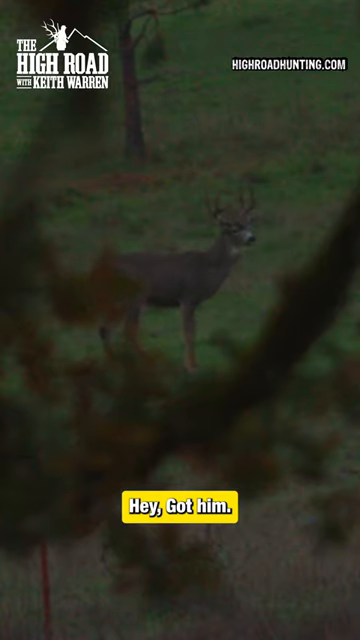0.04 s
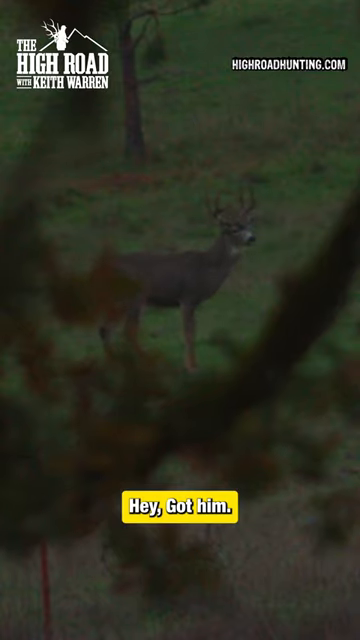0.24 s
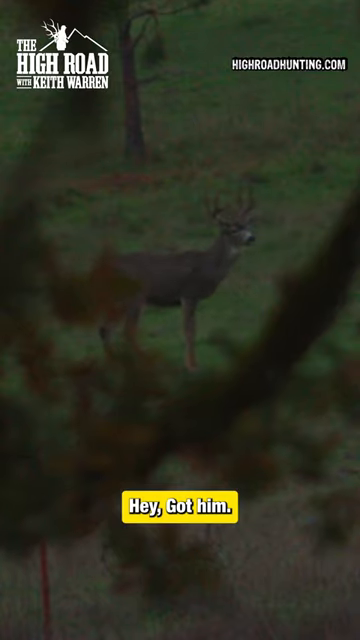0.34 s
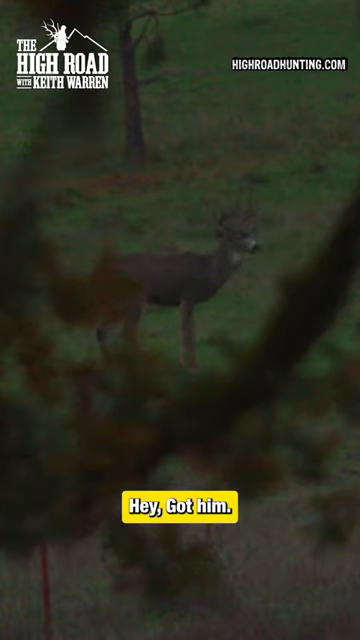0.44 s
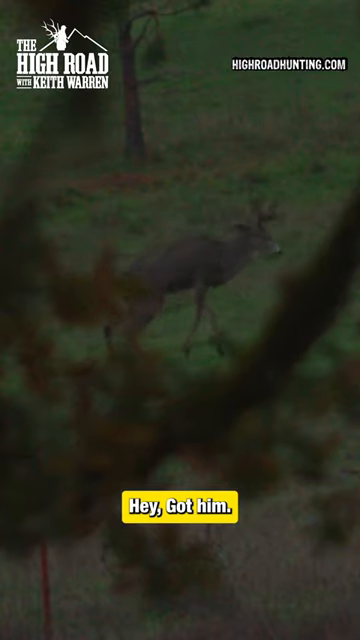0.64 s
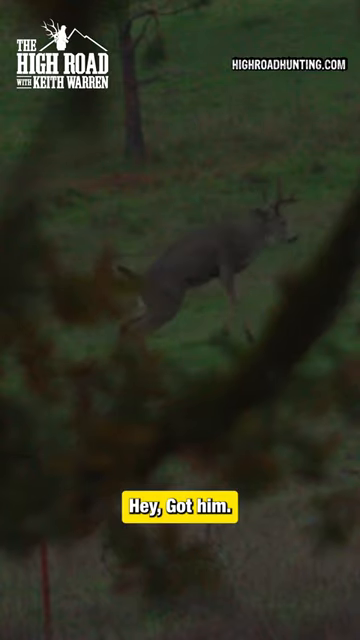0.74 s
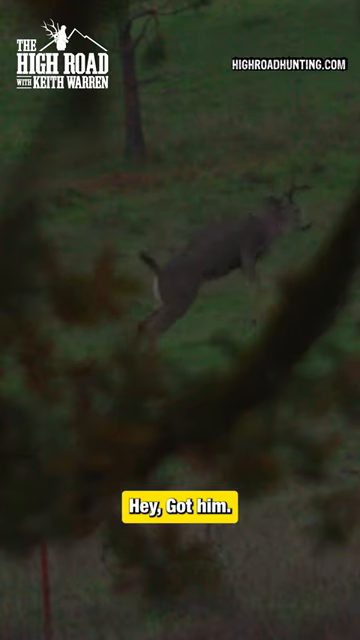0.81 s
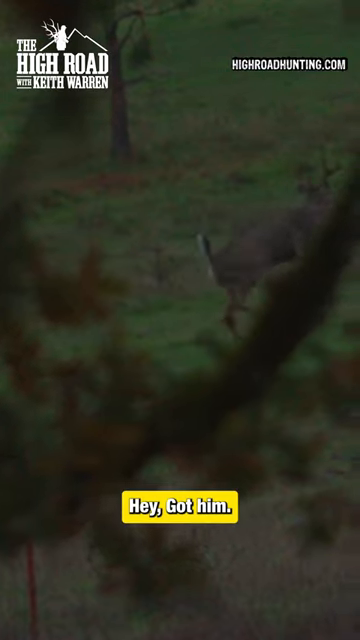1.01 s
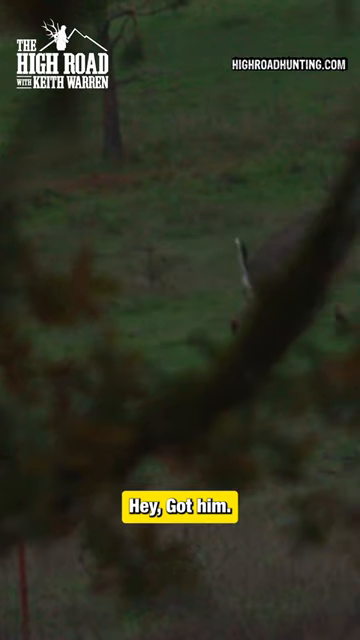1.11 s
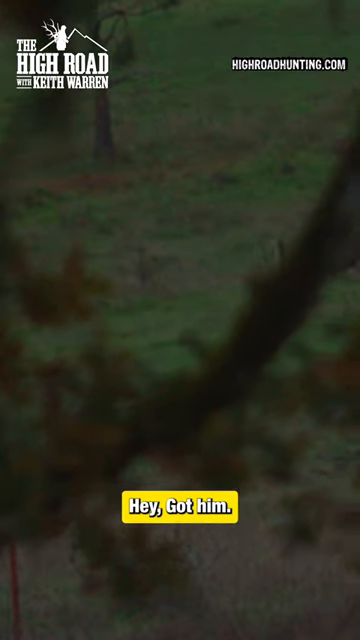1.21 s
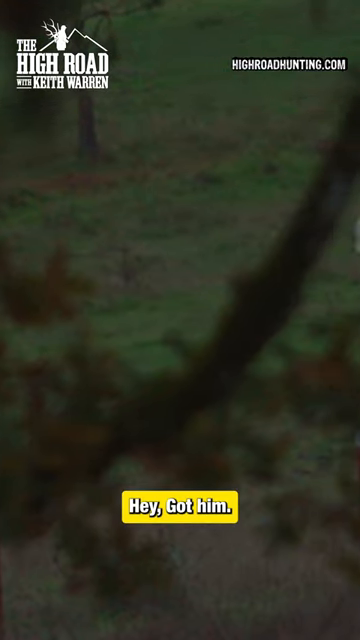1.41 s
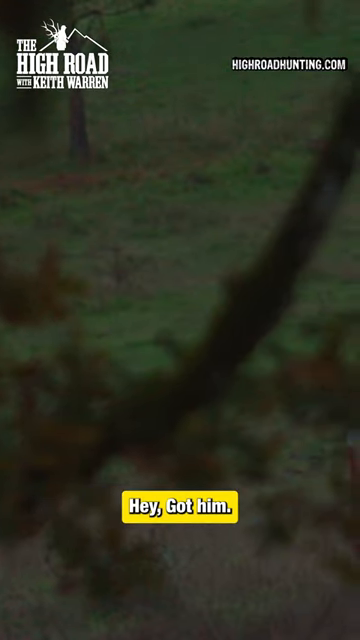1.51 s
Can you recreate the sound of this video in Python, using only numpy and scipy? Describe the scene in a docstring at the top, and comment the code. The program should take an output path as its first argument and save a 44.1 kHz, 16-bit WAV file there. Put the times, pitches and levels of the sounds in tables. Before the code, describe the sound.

One loud rifle shot overloads a nearby microphone outdoors. A metallic clack and a distant bullet impact follow as the report rolls back off the slopes, growing duller. Soft rustling, hollow knocks and a small tick come last, close by.

```python
"""Open pasture, trees and slopes around it. One rifle shot: first the bullet's crack, then a muzzle blast
that overloads the microphone. Steel rings thinly and the action clacks. The bullet thuds home far away,
and the report rolls back off the land, duller as it goes. At the end, close by, come a soft rustle,
a very faint whistle, a few hollow knocks and a small tick."""
import sys
import numpy as np
from scipy import signal
from scipy.fft import rfft, irfft, next_fast_len
from scipy.io import wavfile
from scipy.ndimage import map_coordinates

SR = 44100
rng = np.random.default_rng(int(sys.argv[2]) if len(sys.argv) > 2 else 0)


def transcribe(u):
    """Save the signal u as a 16-bit wav file named by the first command-line argument.

    u: samples, shape (n,) or (channels, n), limited to [-1, 1]; the rate is SR.
    q: integer samples, one column per channel.
    """
    v = np.clip(np.atleast_2d(u).T, -1, 1)
    q = np.round(v * 32767).astype(np.int16)
    wavfile.write(sys.argv[1], SR, q)


N = 68355
TIME = np.arange(N) / SR
CRACK_S, BLAST_S, HIT_S = .2367, .2418, .7939

# Quiet air over the pasture. Each row: frequency in Hz, relative level in dB.
AIR_SPECTRUM = [(25, -9), (60, -2.5), (220, 2), (380, -2.5), (520, -0.5), (750, -5.5), (1400, -11),
                (3300, -13), (6500, -16.5), (10000, -27), (16000, -36)]
# The whistle's partials. Each row: pitch ratio, relative level in dB.
WHISTLE_PARTIALS = [(1, -3), (0.89, -4), (.662, -5)]
# Rustles close by. Each row: centre in seconds, level in dB, half width in seconds.
RUSTLE_STROKES = [(1.149, -53.5, 0.081), (1.41, -53, 0.068)]
# Their soft hiss. Each row: frequency in Hz, relative level in dB.
RUSTLE_SPECTRUM = [(1000, -25), (4500, 0), (7000, -2.5), (10000, -9.5), (15000, -28)]
# Knocks close by. Each row: start in seconds, gain in dB.
KNOCK_STRIKES = [(1.4098, -13), (1.4234, -24), (1.4264, -19.5), (1.4816, -24), (1.4858, -29)]
# The hollow body they sound. Each row: frequency in Hz, relative level in dB, t60 in seconds.
HOLLOW_MODES = [(470, 0, 0.027), (586, -0.5, 0.012), (830, -6, .012), (174, -16.5, 0.06)]
# The bright tick. Each row: frequency in Hz, relative level in dB.
TICK_SPECTRUM = [(1000, -17), (4200, -15), (5600, 4), (7500, -6), (9500, -10), (11500, -21), (16000, -20)]
# The report scattered by the land. Each row: frequency in Hz, relative level in dB.
ROLL_SPECTRUM = [(25, -11), (120, -2.5), (300, -9), (550, 3), (900, 3.5), (1400, -3.5), (2200, -1.5),
                 (4000, 3.5), (6500, 2.5), (10000, -7.5), (16000, -24)]
# How long it hangs on. Each row: frequency in Hz, t60 in seconds.
ROLL_DECAY = [(60, 1.6), (500, 1.66), (1000, 1.79), (2200, 1.86), (4000, 1.136), (7000, 0.87),
              (11000, 0.65), (16000, .55)]
# The long echo off far slopes. Each row: time in seconds, level in dB.
SLOPE_SWELL = [(.6, -67), (0.898, -34.5), (1.05, -40), (1.18, -34.5), (1.3, -38.5), (1.418, -40),
               (1.55, -40)]
# Its dull tone. Each row: frequency in Hz, relative level in dB.
SLOPE_SPECTRUM = [(30, -28), (60, -20), (120, -8.5), (200, -12), (450, -0.5), (750, 2), (1300, -6),
                  (2400, -11), (4000, -19.5), (8000, -36), (16000, -58)]
# Brief returns within it. Each row: start in seconds, level in dB.
SLOPE_RETURNS = [(0.58, -26.5), (1.004, -35), (1.083, -32.5), (1.18, -34.5), (1.316, -39)]
# Banks and groves. Each row: start in seconds, level in dB, hold in seconds, low-pass in Hz.
BANK_ECHOES = [(0.386, -23.5, .012, 1500), (0.465, -28, 0.015, 800), (.496, -20.5, 0.015, 484),
               (0.515, -25.5, 0.01, 1210), (.632, -31, 0.017, 380), (0.661, -32, 0.033, 316),
               (0.867, -40.5, 0.019, 300), (.926, -37.5, 0.026, 418)]
# Scatter where the bullet lands. Each row: frequency in Hz, relative level in dB.
SPLAT_SPECTRUM = [(100, -6), (600, 2), (1800, 4.5), (3000, -7.5), (5000, -11.5), (9000, -27), (15000, -49)]
# The rifle's action. Each row: frequency in Hz, relative level in dB.
CLACK_SPECTRUM = [(100, -31), (380, -10), (690, 6), (1300, -13.5), (2000, -23), (3000, -17.5), (4300, -1.5),
                  (5500, -14.5), (8000, -16), (15000, -31)]
# Ringing steel. Each row: frequency in Hz, relative level in dB, t60 and rise in seconds.
STEEL_MODES = [(9740, 1.5, 0.41, .014), (14440, -11, .19, .008), (15055, -3.5, 0.3, .0005)]
# The crack, straight to the microphone. Each row: frequency in Hz, relative level in dB.
CRACK_SPECTRUM = [(200, -13), (1000, -7), (3500, 3.5), (8000, -6.5), (11000, -16), (16000, -30)]
# The crack off near trees. Each row: frequency in Hz, relative level in dB.
TREE_SPECTRUM = [(200, -9), (1000, -6), (2000, -2.5), (3000, -3.5), (6000, -1.5), (11000, -11.5),
                 (16000, -16)]
# The blast's low boom. Each row: frequency in Hz, relative level in dB.
BOOM_SPECTRUM = [(25, -23), (60, -2), (115, 4.5), (240, -6.5), (480, 1.5), (780, -2), (1300, -12),
                 (1750, -14), (2000, -6), (2400, -17.5), (4000, -11.5), (12000, -58)]
# Its bright spray off the surroundings. Each row: frequency in Hz, relative level in dB.
SPRAY_SPECTRUM = [(100, -21), (1300, -18), (2000, -3), (2600, -9), (4000, -1), (6500, 2.5), (9000, -2),
                  (12000, -12), (16000, -20)]
# The bark just behind the pressure front. Each row: frequency in Hz, relative level in dB.
BARK_SPECTRUM = [(100, -17), (350, -4.5), (550, 0.5), (850, -0.5), (1300, -16), (4000, -33), (16000, -60)]


def amp(db):
    """Decibels to gain."""
    return 10 ** (np.asarray(db) / 20)


def unit(x):
    """Scale to rms 1."""
    return x / np.sqrt(np.mean(x ** 2) + 1e-20)


def along(points, hz):
    """Read (Hz, value) points on a log frequency axis."""
    freqs, values = np.transpose(points)
    return np.interp(np.log(hz + 1), np.log(freqs + 1), values)


def since(start):
    """Seconds elapsed after start, zero before."""
    return np.maximum(TIME - start, 0)


def filtered(x, response):
    """Filter x by a gain given as a function of Hz."""
    size = next_fast_len(N + 8192)
    return irfft(rfft(x, size) * response(np.fft.rfftfreq(size, 1 / SR)), size)[:N]


def noise(spectrum):
    """Coloured noise of rms 1."""
    return unit(filtered(rng.standard_normal(N), lambda hz: amp(along(spectrum, hz))))


def wobble(rate):
    """A smooth random curve, rate knots a second."""
    return map_coordinates(rng.standard_normal(2048), [TIME * rate], mode="wrap")


def decay(start, t60):
    """Full level until start, then down 60 dB every t60 seconds."""
    return np.exp(-np.log(1000) * since(start) / t60)


def burst(start, rise, t60, hold=0):
    """An envelope that rises at start and decays from start + hold; all in seconds."""
    return (1 - np.exp(-since(start) / rise)) * decay(start + hold, t60)


def ring(start, hz, rise, t60):
    """One damped mode struck at start."""
    return burst(start, rise, t60) * np.sin(2 * np.pi * hz * since(start))


def open_air():
    """A low, slightly wavering hush over the pasture."""
    return amp(-52 + .6 * wobble(41.6)) * noise(AIR_SPECTRUM)


def whistle():
    """A very faint, broken whistle arches up and down in pitch."""
    centre_s, half_width_s, peak_hz = 1.268, .05, 14500
    arch = np.exp(-((TIME - centre_s) / half_width_s) ** 2 / 4)
    pitch_hz = peak_hz * (1 - .26 * (1 - arch) + .005 * wobble(900))
    phase = 2 * np.pi * np.cumsum(pitch_hz) / SR
    partials = sum(amp(-65 + db + 3 * wobble(60)) * np.sin(ratio * phase)
                   for ratio, db in WHISTLE_PARTIALS)
    return arch ** 2 * partials


def handling():
    """Small sounds near the microphone: hollow knocks, a soft rustle and one bright tick."""
    knocks = sum(amp(strike_db + mode_db) * ring(start, hz, rise=.0011, t60=t60)
                 for start, strike_db in KNOCK_STRIKES for hz, mode_db, t60 in HOLLOW_MODES)
    strokes = sum(amp(db) * np.exp(-((TIME - centre) / half_width) ** 2 / 2)
                  for centre, db, half_width in RUSTLE_STROKES)
    tick = amp(-29.5) * burst(1.4938, rise=.00022, t60=.0081) * noise(TICK_SPECTRUM)
    return knocks + strokes * noise(RUSTLE_SPECTRUM) + tick


def rolling_report():
    """The report scatters over the land, treble dying first; far slopes send back a late swell."""
    hz, frame_s, bands = signal.stft(noise(ROLL_SPECTRUM), SR, nperseg=256)
    fade = np.exp(-np.log(1000) * np.maximum(frame_s - BLAST_S, 0) / along(ROLL_DECAY, hz)[:, None])
    scatter = signal.istft(bands * fade, SR, nperseg=256)[1][:N]
    near = amp(-11.5) * scatter * (1 - np.exp(-since(BLAST_S) / .11))
    swell_db = np.interp(TIME, *np.transpose(SLOPE_SWELL), left=-120)
    far = amp(swell_db) * noise(SLOPE_SPECTRUM)
    pulses = sum(amp(db) * burst(start, rise=.0028, hold=.0094, t60=.046) for start, db in SLOPE_RETURNS)
    out = pulses * noise(SLOPE_SPECTRUM)
    for layer in (near, far):
        flutter_db = 1.22 * (wobble(44.89) + wobble(400))
        out += layer * amp(flutter_db)
    return out


def bank_echoes():
    """Single banks and groves return the boom as muffled thumps."""
    low_cut_hz = 61.6
    out = np.zeros(N)
    for start, db, hold, top_hz in BANK_ECHOES:
        white = rng.standard_normal(N)
        dull = filtered(white, lambda hz: hz / np.hypot(hz, low_cut_hz) / (1 + (hz / top_hz) ** 2))
        out += amp(db) * burst(start, rise=.0028, hold=hold, t60=.033) * unit(dull)
    return out


def bullet_hit():
    """The bullet lands far off: a sharp slap, a deep thud and a short scatter."""
    slap_width_s = .0001
    widths = (TIME - HIT_S - slap_width_s) / slap_width_s
    slap = -amp(-9) * widths * np.exp((1 - widths ** 2) / 2)  # one swing up, one down
    thud = amp(-2) * ring(HIT_S, hz=134.3, rise=.0057, t60=.038)
    splat = amp(-23.5) * burst(HIT_S, rise=.00021, t60=.17) * noise(SPLAT_SPECTRUM)
    return slap - thud + splat


def rifle_action():
    """A steel part rings thinly, fluttering until it is damped, and the action clacks."""
    clack = amp(-7.5) * burst(.4417, rise=.0003, hold=.0037, t60=.017) * noise(CLACK_SPECTRUM)
    drift_hz, flutter_db = 16, 3.5
    steel = np.zeros(N)
    for hz, db, t60, rise in STEEL_MODES:
        phase = 2 * np.pi * np.cumsum(hz + drift_hz * wobble(70)) / SR
        level = amp(-22.5 + db + flutter_db * wobble(70))
        steel += level * burst(.391, rise, t60) * np.sin(phase)
    return clack + steel * decay(.534, t60=.25)


def bullet_crack():
    """The crack reaches the microphone just ahead of the blast; near trees throw it back."""
    direct = amp(-8) * burst(CRACK_S, rise=.0008, hold=.0008, t60=.01) * noise(CRACK_SPECTRUM)
    trees = amp(-11.5) * burst(.3125, rise=.0014, hold=.0081, t60=.033) * noise(TREE_SPECTRUM)
    return direct + trees


def muzzle_blast():
    """The pressure front's first swings, a dense bark, a low boom and a spray off the surroundings."""
    front = amp(1) * ring(BLAST_S, hz=612, rise=.00076, t60=.026)
    boom_db = -7.5 - 86 * since(BLAST_S)
    boom = amp(boom_db) * burst(BLAST_S, rise=.00067, hold=.094, t60=.05) * noise(BOOM_SPECTRUM)
    spray_db = -13 - 107 * since(BLAST_S + .076) + 1.4 * wobble(300)
    spray = amp(spray_db) * burst(BLAST_S, rise=.00067, hold=.177, t60=.037) * noise(SPRAY_SPECTRUM)
    bark = amp(-10.5) * burst(BLAST_S, rise=.0008, hold=.012, t60=.087) * noise(BARK_SPECTRUM)
    return front + bark + boom + spray


def scene():
    """The shot, the distance and the small sounds nearby, as they reach one microphone."""
    air = open_air()
    shot = bullet_crack() + muzzle_blast() + rifle_action()
    distance = rolling_report() + bank_echoes() + bullet_hit()
    return (air + shot + distance + handling() + whistle())[None]


def record(dry):
    """The microphone overloads on the blast and keeps nothing above its band limit."""
    ceiling, knee, top_hz = .68, 3.2, 15900
    clipped = dry[0] / (1 + np.abs(dry[0] / ceiling) ** knee) ** (1 / knee)
    return filtered(clipped, lambda hz: 1 / (1 + (hz / top_hz) ** 160))[None]


dry = scene()
out = record(dry)
transcribe(out)
```